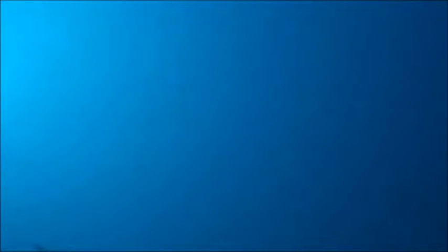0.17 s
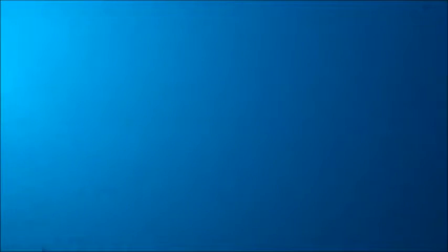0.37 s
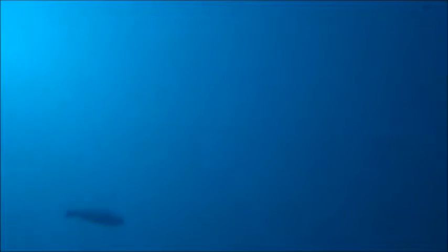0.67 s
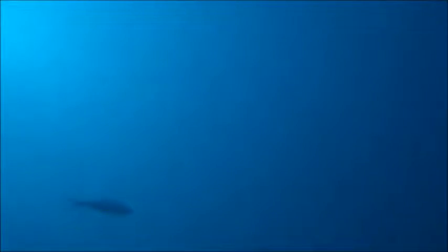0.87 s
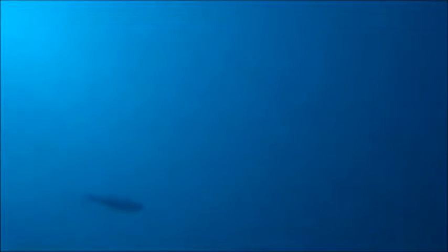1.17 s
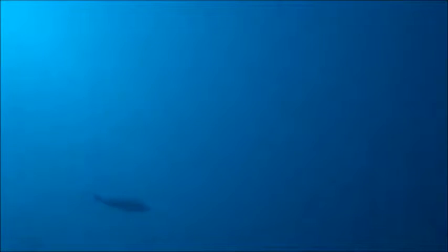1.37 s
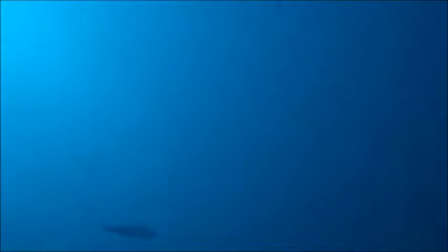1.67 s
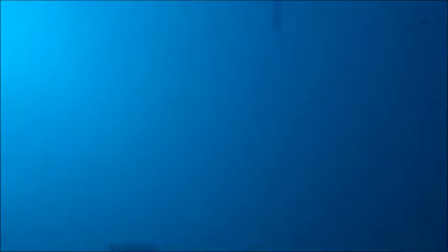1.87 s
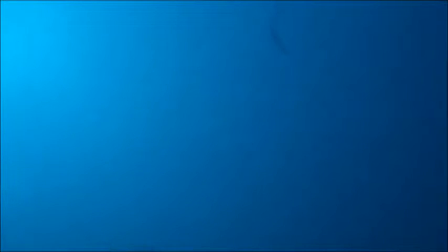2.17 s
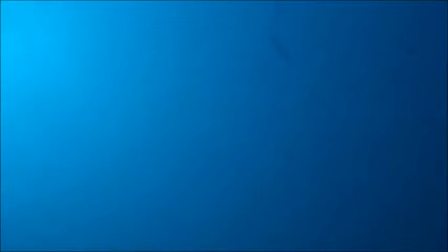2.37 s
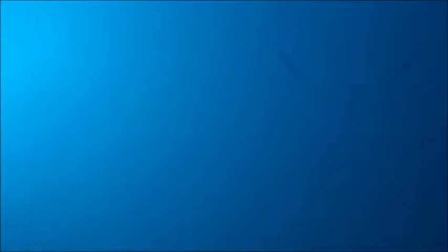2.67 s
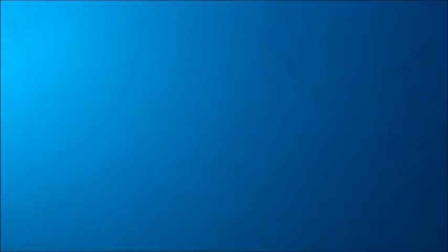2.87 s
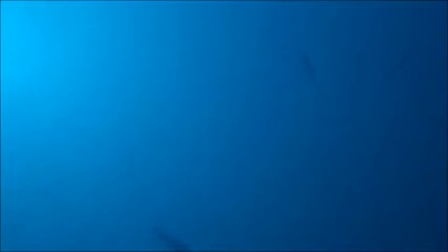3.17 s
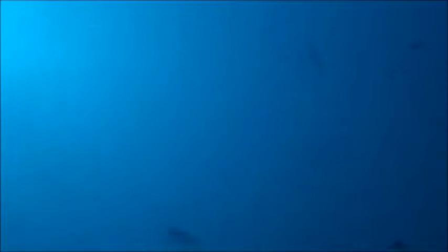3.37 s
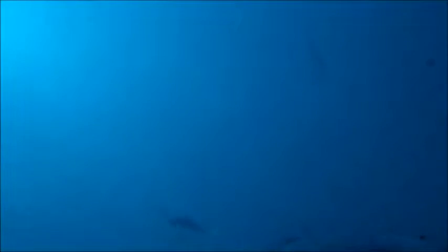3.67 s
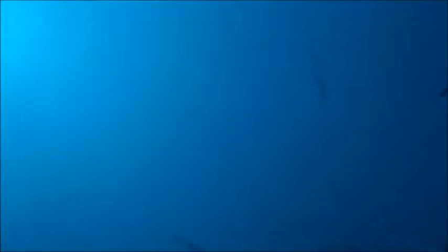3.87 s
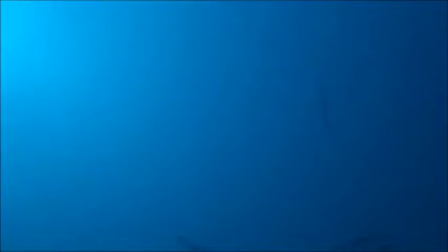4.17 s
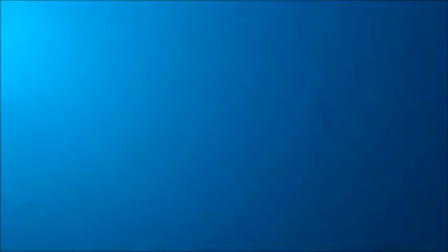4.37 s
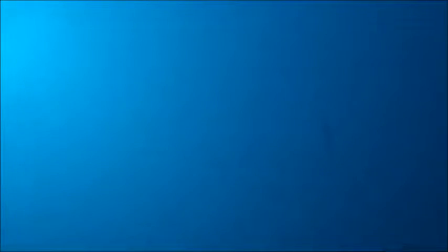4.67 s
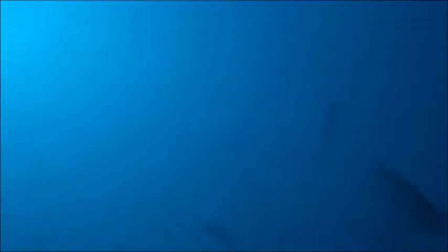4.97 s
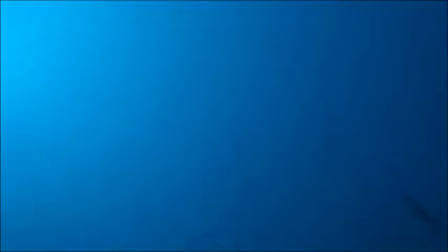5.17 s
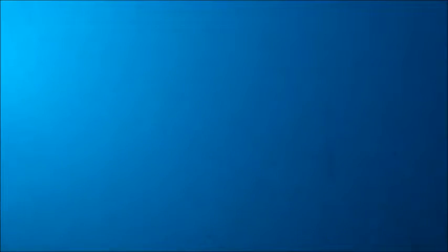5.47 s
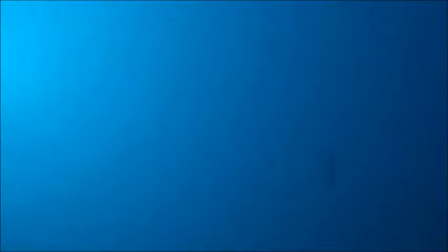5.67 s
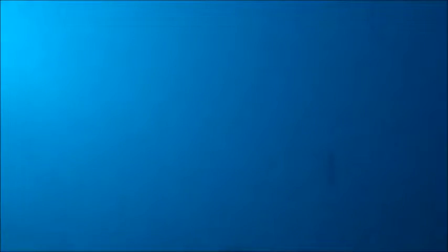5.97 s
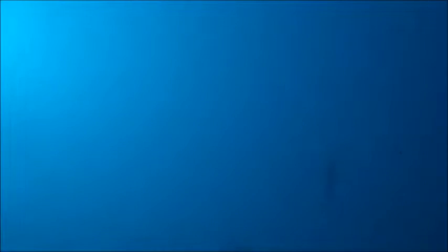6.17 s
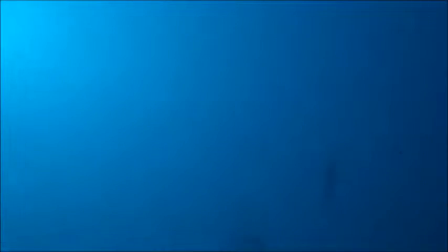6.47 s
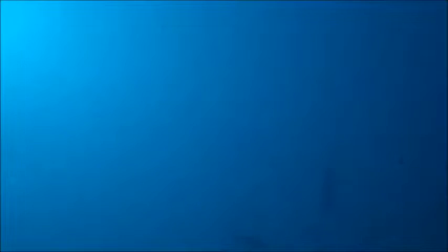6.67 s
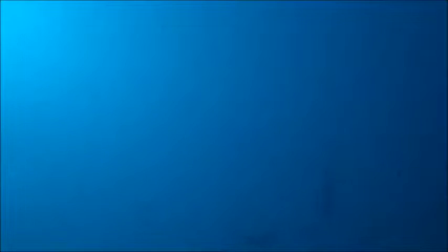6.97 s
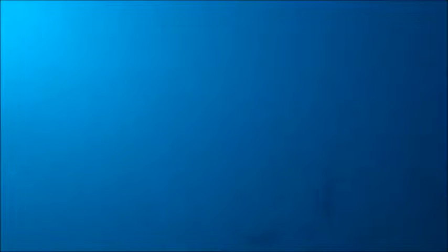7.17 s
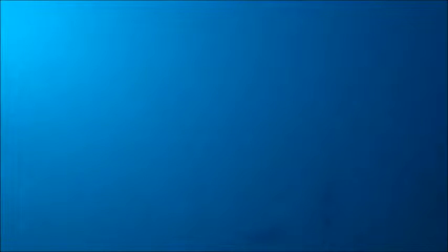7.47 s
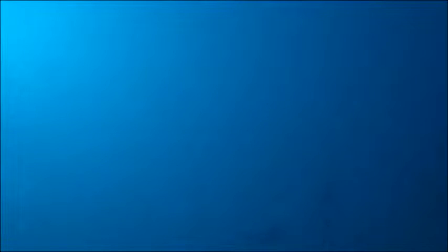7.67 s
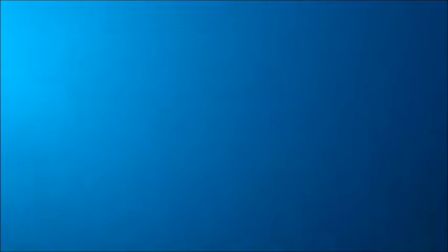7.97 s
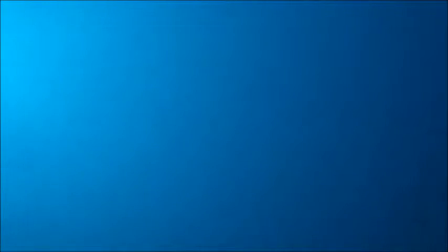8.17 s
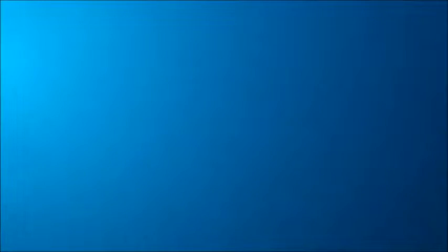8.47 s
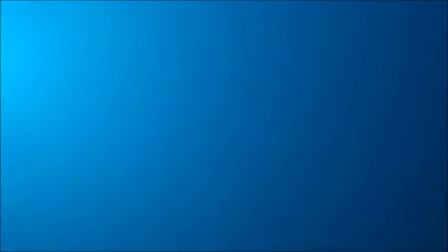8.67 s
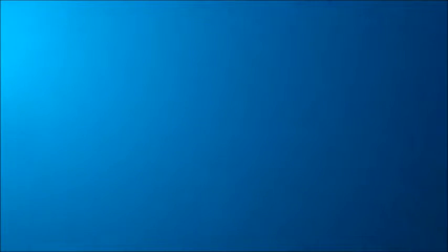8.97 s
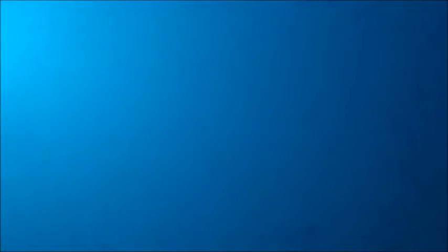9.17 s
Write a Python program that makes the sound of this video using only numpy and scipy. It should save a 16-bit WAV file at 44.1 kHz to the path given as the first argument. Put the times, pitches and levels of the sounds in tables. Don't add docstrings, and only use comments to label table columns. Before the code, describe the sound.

A close, boxy underwater sound: dull continuous water hiss, small metallic clockwork ticks, and occasional plastic squeaks and far crackles. Fingers strike the housing around the microphone: a moderate knock, a faint soft one, and a loud sharp knuckle blow halfway. After a calm stretch comes a dense short flurry of low thuds and rubbing, then a few small dull taps over unchanged hiss.

```python
import sys
import numpy as np
from scipy import signal
from scipy.io import wavfile

SR = 44100
rng = np.random.default_rng(int(sys.argv[2]) if len(sys.argv) > 2 else 0)


def linear_from_db(decibels):
    return 10 ** (np.asarray(decibels, float) / 20)


def dump_mix(stems):
    frames = np.atleast_2d(stems).T
    limited = np.clip(frames, -1, 1)
    pcm = np.round(limited * 32767).astype(np.int16)
    wavfile.write(sys.argv[1], SR, pcm)


N = 411887

# [f/Hz, level per hertz/dB]
HISS_SPECTRUM = [(30, -1), (130, -3.5), (300, -7.5), (700, -11.5), (1400, -14.5), (2100, -16.5),
                 (3000, -19.5), (5000, -23), (8000, -28.5), (9300, -29.5), (10500, -34), (12300, -33),
                 (14800, -36), (15400, -40)]
# [t/s, activity level/dB, f/Hz]
SHELL_STRAIN = [(0.0, -64.5, 1670), (0.47, -68, 1720), (0.88, -66, 1800), (1.4, -67, 1880),
                (1.8, -64.5, 1790), (2.28, -66, 1870), (2.5, -69.5, 1630), (3.2, -69, 1840),
                (3.82, -66.5, 2010), (4.32, -68.5, 1860), (5.0, -67, 1900), (5.4, -69, 1760),
                (6.3, -69, 1720), (7.25, -69.5, 1690), (7.9, -63, 1800), (8.5, -65, 1860),
                (8.87, -73, 1650), (9.34, -66.5, 1950)]
# [t/s, peak level/dB, f/Hz]
CHIRPS = [(0.809, -47.5, 1360), (1.316, -49, 2040), (1.334, -50, 1890), (1.806, -48, 1400),
          (1.93, -44, 2030), (1.9393, -46, 2130), (1.971, -43.5, 1410), (2.017, -48.5, 1250),
          (2.184, -45, 2040), (2.193, -54, 1950), (2.248, -52, 1980), (2.285, -48, 2150),
          (2.3246, -48, 1930), (3.618, -51, 2090), (3.65, -50, 2060), (3.8202, -48.5, 2100),
          (4.525, -49, 1950), (4.65, -47, 1950), (5.5977, -50, 1950), (5.6501, -48.5, 1880),
          (6.2595, -50, 1810), (6.2964, -52, 1700), (6.643, -49, 1840), (6.654, -39, 1650),
          (6.663, -42.5, 1750), (7.3088, -50, 1450), (7.87, -52, 1820), (7.881, -47.5, 2170),
          (7.8944, -47, 1600), (8.51, -44, 1720)]
# [t/s, peak level/dB, f/Hz]
SNAPS = [(0.353, -53, 5890), (0.8827, -49, 9410), (1.6356, -52, 5260), (1.93, -51, 6560),
         (1.978, -55, 4910), (2.0243, -60, 4540), (2.5097, -62, 4510), (3.024, -45, 9210),
         (3.0604, -49, 4940), (3.3774, -47.5, 7010), (3.4067, -56, 5750), (3.7514, -54, 5260),
         (3.8177, -52, 5230), (4.0407, -56, 5055), (4.5166, -57, 5200), (5.4804, -54, 4810),
         (5.5408, -52, 4830), (6.0483, -48, 4520), (6.1384, -55, 6760), (7.1283, -51, 8530),
         (7.4724, -52, 5000), (7.5393, -50, 5590)]
# [f/Hz, level/dB, t60/s]
CRACKLE_MODES = [(4300, -15, .003), (5700, -3, 0.0036), (7900, 0, 0.0035), (8900, -6, 0.0063),
                 (11400, -4, 0.0057)]
# [t/s, peak level/dB, shell f/Hz]
TICK_COUPLING = [(0, -51.5, 1560), (.95, -51, 1930), (1.95, -46, 1980), (2.7, -57, 1400), (3.6, -43, 2050),
                 (4.65, -51.5, 2080), (4.95, -55, 1820), (5.8, -46, 1350), (6.3, -50.5, 1800),
                 (7.2, -52.5, 1580), (7.7, -45, 1620), (8.4, -51, 1600), (9.34, -51, 1750)]
# [f/Hz, level/dB, t60/s]
TICK_MODES = [(2050, 5, 0.033), (1500, -20, 0.014), (3100, -2, 0.015), (3660, -4, 0.005),
              (4030, -1, 0.0082), (5640, 2, 0.0045), (7000, -16, 0.0027), (8500, -8, 0.0032),
              (12400, -19, 0.0035)]
# [t/s, hold/s, fade/s, scratch level/dB, rumble level/dB]
PRESSES = [
    (0.652, .042, 0.055, -61, -55),
    (3.393, .03, .04, -72, -61.5),
    (4.984, 0.039, 0.012, -60.5, -57),
    (9.034, 0.031, .04, -65, -58),
]
# [f/Hz, level/dB, t60/s]
PRESS_MODES = [(1600, -19, 0.0066), (2030, 0, 0.0084), (2700, -8, .006), (3720, -6.5, 0.013),
               (5260, -11, .005), (6740, -5, .004), (7450, -4, .005), (9000, -6, .003)]
# [t/s, hold/s, scratch level/dB, brightness/dB, rumble level/dB]
GRIP_STROKES = [
    (5.037, 0.0033, -42, -24, -60),
    (8.015, .006, -50.5, -18, -46),
    (8.027, 0.017, -39.5, -7.5, -43),
    (8.051, 0.007, -34.5, -31, -41),
    (8.076, 0.0071, -41, -29, -46),
    (8.101, 0.021, -42.5, -28, -33.5),
    (8.138, 0.0055, -46, -15, -38),
    (8.161, 0.014, -52, -16, -52),
    (8.181, .002, -51.5, -21, -52),
]
# [t/s, push level/dB, ring level/dB]
KNOCKS = [
    (0.6992, -30.5, 3),
    (0.96, -64, -1.5),
    (3.4659, -36.5, 0),
    (4.986, -53, 0),
    (5.0309, -22, 0.5),
    (8.1215, -41, 12),
    (8.143, -35.5, -0.5),
    (9.162, -52.5, 2),
]
# [f/Hz, amplitude/1, t60/s, share that rings/1]
BODY_MODES = [(174.1, -11.03, .0086, 0), (211.7, 11.98, .0031, 0), (177.9, 1.43, .058, 1),
              (243.4, 3.36, .052, 1), (256, .1, .22, 1), (318, .07, .15, 1), (205, -.05, .2, 1)]
# [t/s, peak level/dB, f/Hz, t60/s]
THUDS = [(.688, -54, 100, .03), (3.69, -51.5, 149, 0.024), (5.02, -49, 100, .03), (8.012, -40, 90, .03),
         (8.022, -40, 270, .04), (8.058, -27, 280, .01), (8.0608, -22, 300, .017), (8.0912, -25, 450, .011),
         (8.0943, -27, 330, .012), (8.0973, -25, 300, .01), (8.1015, -17, 230, .011),
         (8.1018, -26, 340, .022), (8.1105, -18, 270, .014), (8.1168, -19, 290, .014),
         (8.12, -37, 48, 0.16), (9.051, -44, 140, 0.014)]
# [t/s, peak level/dB, f/Hz, brightness/dB, whole shell level/dB]
TAPS = [
    (0.7022, -37, 2500, -4, -6),
    (0.7045, -33, 2020, -20, 1),
    (3.469, -44, 2000, -12, -6),
    (5.0338, -35, 1940, 0, -5),
    (9.035, -45, 2050, -14, -15),
    (9.1627, -40.5, 1500, -34, -42),
    (9.165, -31.5, 2110, -28, -29),
    (9.1651, -34, 1520, -34, -35),
    (9.168, -39, 2110, -36, -31),
]
# [t/s, peak level/dB, f/Hz, brightness/dB, whole shell level/dB]
BUMPS = [(4.98, -53, 2030, 4, -5), (4.999, -54, 2180, 4, -3), (8.035, -30.5, 2420, -26, -31),
         (8.049, -36, 2450, -19, 0), (8.0762, -28.5, 1890, -27, -15), (8.0911, -27.5, 890, -36, -17),
         (8.1021, -19.5, 2140, -13, -5), (8.113, -25.5, 2000, -18, -2), (8.1204, -21.5, 1880, -13.5, 2),
         (8.139, -28.5, 2150, -22, -21), (8.144, -35, 2090, -19, -16), (8.1777, -33, 2290, -12, -5)]
# [t/s, peak level/dB, f/Hz, brightness/dB, whole shell level/dB]
BLOWS = [
    (0.7, -37.5, 1650, -24, -8),
    (5.0316, -15, 1920, -15, 0),
]
# [f/Hz, level/dB, t60/s]
SHELL_MODES = [(472, -9.5, 0.16), (645, -15, 0.018), (1020, 0, 0.0073), (1110, -24, 0.049),
               (1450, -3, 0.037), (1950, 11, 0.0064), (2420, -6, 0.018), (2910, 2.5, 0.0058)]
SHELL_TOP_MODES = [(3350, 9, 0.0076), (4130, 0, 0.005), (5500, 3, 0.0059), (6250, 3, 0.0061),
                   (7300, -17, .003), (9000, -24, .003), (11500, -18, .002), (14000, -33, .002)]


def rms_one(x):
    return x / np.sqrt(np.mean(x ** 2) + 1e-20)


def peak_one(x):
    return x / abs(x).max()


def add(out, s, piece):
    at = round(s * SR)
    out[at:at + len(piece)] += piece[:N - at]


def in_time(rows):
    s, *columns = np.transpose(rows)
    return [np.interp(np.arange(N) / SR, s, c) for c in columns]


def drift(rate_hz):
    r = np.exp(-2 * np.pi * rate_hz * 40 / SR)
    noise = rng.standard_normal(N // 40 + 2002)
    slow = signal.lfilter([1], [1, -2 * r, r * r], noise)[2000:]
    return np.interp(np.arange(N) / 40, np.arange(len(slow)), rms_one(slow))


def grains(per_s, spread_db):
    sizes = linear_from_db(spread_db * np.minimum(rng.exponential(1, N), 4))
    sizes = sizes * rng.choice([-1, 1], N)
    return sizes * (rng.random(N) < per_s / SR)


def ring(clicks, hz, t60):
    r = linear_from_db(-60 / (max(t60, 1e-3) * SR))
    w = 2 * np.pi * hz / SR
    return signal.lfilter([0, np.sin(w)], [1, -2 * r * np.cos(w), r * r], clicks + 1e-18)


def modes(clicks, table, spread_db):
    luck = linear_from_db(spread_db * rng.standard_normal(len(table)))
    return sum(luck[k] * linear_from_db(db) * ring(clicks, hz, t60) for k, (hz, db, t60) in enumerate(table))


def soften(x, hz):
    return signal.sosfilt(signal.butter(2, hz, fs=SR, output="sos"), x)


def hiss(patchy_db):
    out, together = 0, drift(9)
    edges = 20 * 2 ** np.arange(0, 10, .5)
    white = rng.standard_normal((2, N))
    hzs, dbs = np.transpose(HISS_SPECTRUM)
    for k, (low, high) in enumerate(zip(edges, edges[1:])):
        band = signal.sosfilt(signal.butter(2, [low, high], "band", fs=SR, output="sos"), white[k % 2])
        level_db = np.interp(np.log(low * high) / 2, np.log(hzs), dbs)
        flicker_db = patchy_db * (1.35 * together + 0.5 * drift(13))
        out = out + band * linear_from_db(level_db + flicker_db)
    return linear_from_db(-61.5) * rms_one(out)


def creaks():
    level_db, centre_hz = in_time(SHELL_STRAIN)
    clicks = grains(200.0 * linear_from_db(7 * drift(14)), 1.5)
    dealt, out = rng.integers(0, 12, N), 0
    for k, hz in enumerate(np.geomspace(1200, 2400, 12)):
        near = np.exp(-(np.log(hz / centre_hz) / 0.28) ** 2)
        out = out + ring(clicks * near * (dealt == k), hz, 30.0 / hz)
    busy_db = 1.5 * (level_db - np.median(level_db))
    out = linear_from_db(np.clip(busy_db, -20, 12) - 73) * rms_one(out)
    age = np.arange(2500) / SR
    decay_s, rise_s = 0.0041, 0.0029
    for s, peak_db, hz in CHIRPS:
        rubbing = rng.standard_normal(len(age)) * np.exp(-age / decay_s) * np.minimum(age / rise_s, 1)
        chirp = ring(rubbing, hz, 0.018) + .7 * ring(rubbing, 3450 - hz, 0.012)
        add(out, s, linear_from_db(peak_db - 3.5) * peak_one(chirp))
    return out


def snaps():
    out, age = np.zeros(N), np.arange(400) / SR
    for s, peak_db, hz in SNAPS:
        burst = rng.standard_normal(len(age)) * np.exp(-age / .0007)
        clear = peak_one(ring(burst, hz, .003))
        broad = peak_one(modes(burst, CRACKLE_MODES, spread_db=3))
        add(out, s, linear_from_db(peak_db - 1.5) * peak_one(.4 * clear + broad))
    crackle = modes(grains(500 * linear_from_db(8 * drift(14)), 2.5), CRACKLE_MODES, spread_db=0)
    out += linear_from_db(-86) * rms_one(crackle)
    for hz in (9100, 12100):
        lone = ring(grains(30 * linear_from_db(6 * drift(3)), 2.2), hz, .0025)
        out += linear_from_db(-92.5) * rms_one(lone)
    return signal.sosfilt(signal.butter(2, 3200, "high", fs=SR, output="sos"), out)


def ticks():
    out, age = np.zeros(N), np.arange(900) / SR
    first_s, beat_s = .1994, .25003
    scatter_db, scatter_pitch = 0.8, 0.084
    times, level_db, pitch_hz = np.transpose(TICK_COUPLING)
    for s in np.arange(first_s, N / SR, beat_s):
        luck = rng.standard_normal(2)
        hz = np.interp(s, times, pitch_hz) * np.exp(scatter_pitch * luck[0])
        peak_db = np.interp(s, times, level_db) + scatter_db * luck[1]
        scuff = rng.standard_normal(len(age)) * np.exp(-age / 0.00049)
        scuff[:2] = 3.5
        tick = 1.2 * ring(scuff, hz, 0.022) + modes(scuff, TICK_MODES, spread_db=3.0)
        add(out, s, linear_from_db(peak_db) * peak_one(tick))
    return out


def stroke(layers, mix, start_s, swell_s, hold_s, fade_s):
    age = np.arange(int((swell_s + hold_s + fade_s) * SR)) / SR
    range_db = 29
    gain_db = np.interp(age, np.cumsum([0, swell_s, hold_s, fade_s]), [-range_db, 0, 0, -range_db])
    at = round((start_s - swell_s) * SR)
    return linear_from_db(gain_db) * (mix @ layers[:, at:at + len(age)])


def rubs():
    slips = soften(grains(5000 * linear_from_db(4 * drift(90)), 2.5), 7000)
    shaking = rng.standard_normal(N)
    rumble = ring(shaking, 182, 0.033) + ring(shaking, 125, 0.039)
    rumble += linear_from_db(-8) * ring(shaking, 88, 0.037) + linear_from_db(-19) * ring(shaking, 325, 0.084)
    scratch = rms_one(modes(slips, SHELL_MODES, spread_db=0))
    top = rms_one(modes(slips, SHELL_TOP_MODES, spread_db=0))
    squeak = rms_one(modes(slips, PRESS_MODES, spread_db=0))
    layers, out = np.array([scratch, top, squeak, rms_one(rumble)]), np.zeros(N)
    grip_swell_s, grip_fade_s, press_swell_s = .01, 0.021, 0.037
    for s, hold_s, scratch_db, bright_db, rumble_db in GRIP_STROKES:
        mix = [linear_from_db(scratch_db), linear_from_db(scratch_db + bright_db), 0, linear_from_db(rumble_db)]
        add(out, s - grip_swell_s, stroke(layers, mix, s, grip_swell_s, hold_s, grip_fade_s))
    for s, hold_s, fade_s, scratch_db, rumble_db in PRESSES:
        mix = [0, 0, linear_from_db(scratch_db), linear_from_db(rumble_db)]
        add(out, s - press_swell_s, stroke(layers, mix, s, press_swell_s, hold_s, fade_s))
    return out


def push(contact_s, size=4000):
    shape = np.sin(np.pi * np.clip(np.arange(size) / (contact_s * SR), 0, 1)) ** 2
    return -shape / shape.sum()


def knocks():
    out = np.zeros(N)
    for s, push_db, ring_db in KNOCKS:
        body = sum(a * linear_from_db(ring_db * rings) * ring(push(.0017), hz, t60) for hz, a, t60, rings in BODY_MODES)
        add(out, s, linear_from_db(push_db) * body)
    for s, peak_db, hz, t60 in THUDS:
        add(out, s, linear_from_db(peak_db + 6) * ring(push(.0012), hz, t60))
    return signal.sosfilt(signal.butter(1, 30, "high", fs=SR, output="sos"), out)


def taps():
    out, age = np.zeros(N), np.arange(2000) / SR
    lag = round(.0023 * SR)
    rows = [(*row, .0006, 0) for row in TAPS]
    rows += [(*row, .0016, 0) for row in BUMPS]
    rows += [(*row, .0003, linear_from_db(1.5)) for row in BLOWS]
    for s, peak_db, hz, bright_db, shell_db, contact_s, rebound in rows:
        contact = rng.standard_normal(len(age)) * np.exp(-age / contact_s)
        contact[:3] = -0.68
        contact[lag:] -= rebound * contact[:-lag]
        nearest = np.diff(ring(contact, hz, .013), prepend=0) * SR / (2 * np.pi * hz)
        middle = nearest + linear_from_db(shell_db) * modes(contact, SHELL_MODES, spread_db=1.5)
        top = modes(contact, SHELL_TOP_MODES, spread_db=2)
        tap = peak_one(soften(middle, 3300)) + linear_from_db(bright_db) * peak_one(soften(top, 9000))
        add(out, s, linear_from_db(peak_db) * tap)
    return out


def scene():
    return (hiss(patchy_db=0.5) + creaks() + snaps() + ticks() + rubs() + knocks() + taps())[None]


def thin_top(x, from_hz, to_hz, keep):
    window = np.sin(np.pi * (np.arange(2048) + .5) / 2048)
    shape = dict(window=window, nperseg=2048, noverlap=1024)
    hz, _, cells = signal.stft(x, SR, **shape)
    high = hz > from_hz
    top = abs(cells[:, high])
    usual = np.median(top[:, :80], axis=1, keepdims=True) ** .5 * np.median(top[:, :80]) ** .5
    threshold = keep * usual * linear_from_db(-(hz[high, None] - from_hz) / 560)
    cells[:, high] *= 1.35 * (top > threshold)
    cells[:, hz > to_hz] = 0
    return signal.istft(cells, SR, **shape)[1][:, :N]


def top_cut(x):
    return signal.sosfilt(signal.butter(12, 15650, fs=SR, output="sos"), x)


def record(dry):
    x = signal.sosfilt(signal.butter(1, 15, "high", fs=SR, output="sos"), dry)
    mix = thin_top(x, from_hz=12750, to_hz=15290, keep=1.75)
    return top_cut(mix)


dry = scene()
out = record(dry)
dump_mix(out)
```